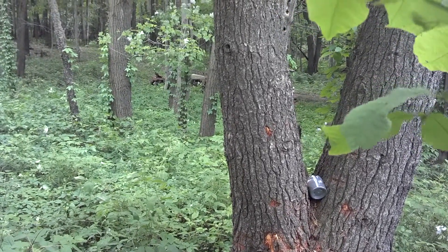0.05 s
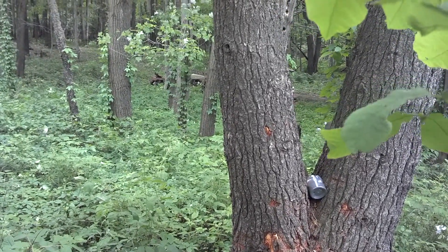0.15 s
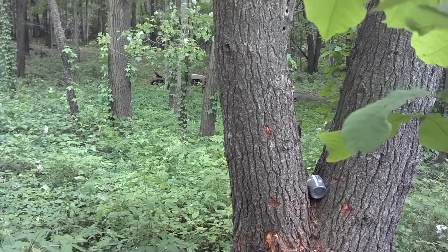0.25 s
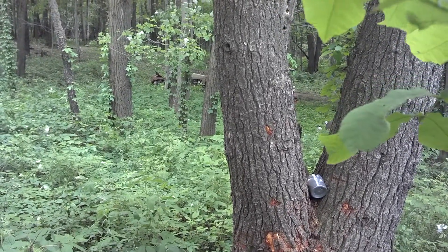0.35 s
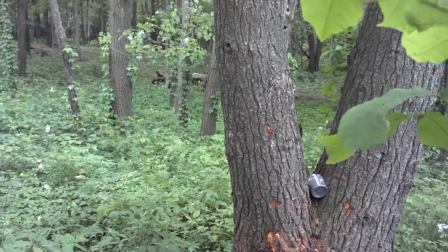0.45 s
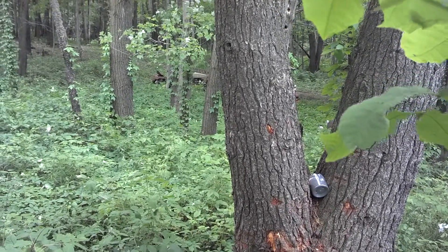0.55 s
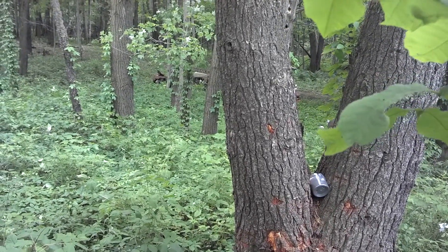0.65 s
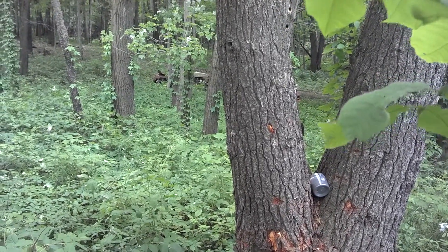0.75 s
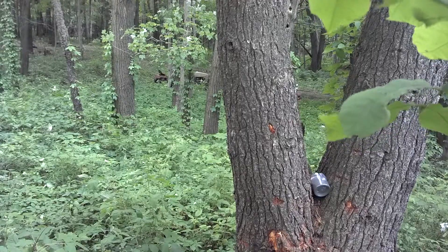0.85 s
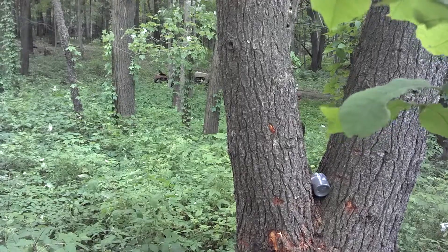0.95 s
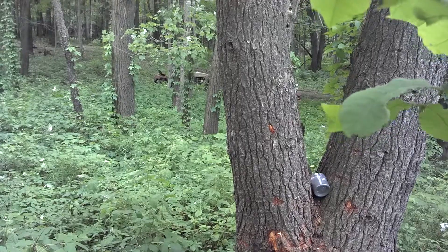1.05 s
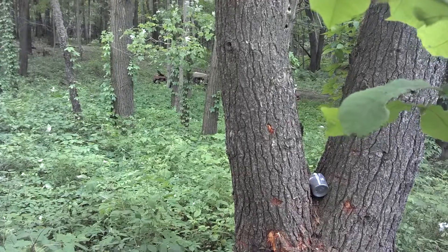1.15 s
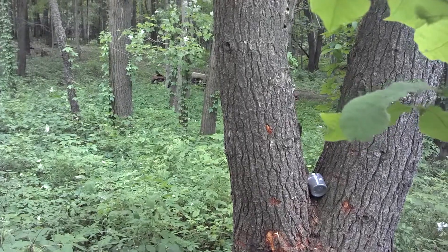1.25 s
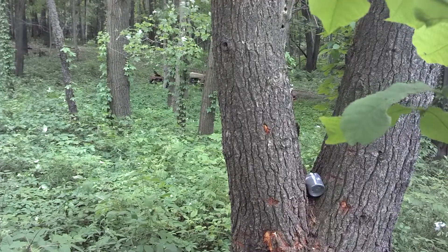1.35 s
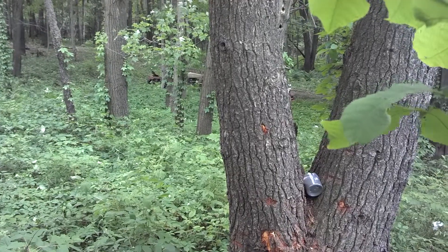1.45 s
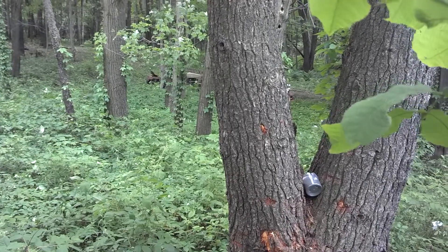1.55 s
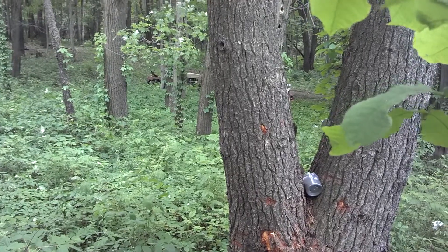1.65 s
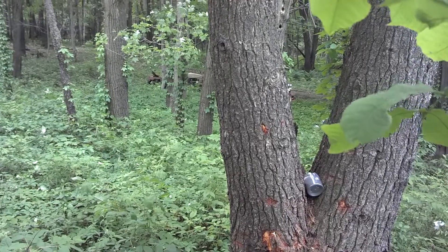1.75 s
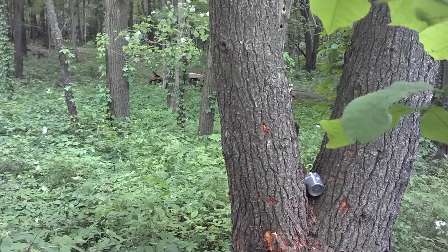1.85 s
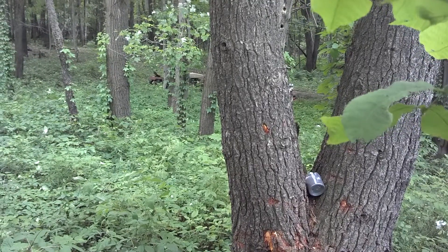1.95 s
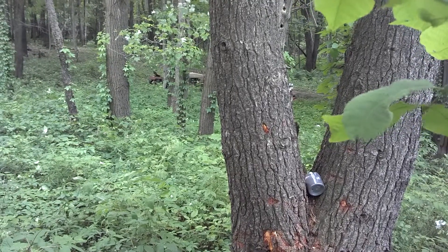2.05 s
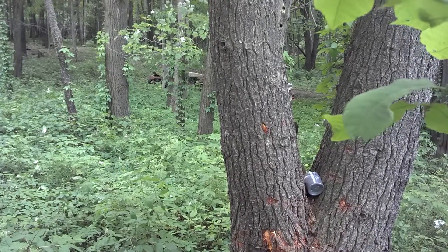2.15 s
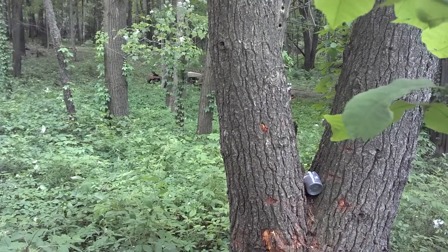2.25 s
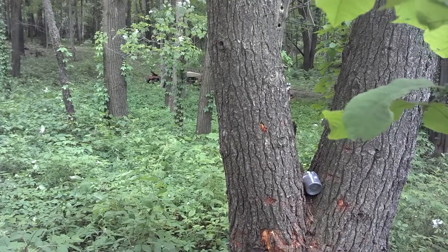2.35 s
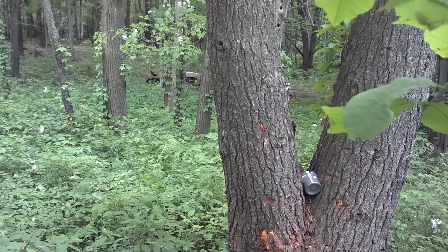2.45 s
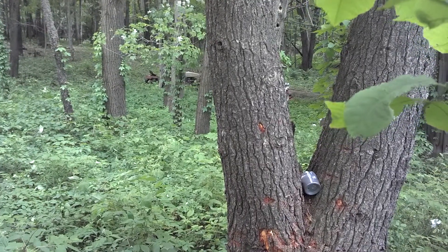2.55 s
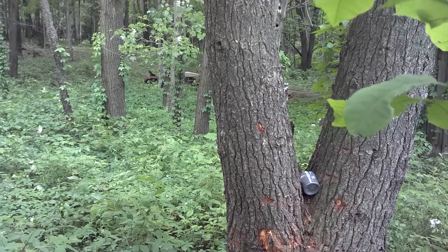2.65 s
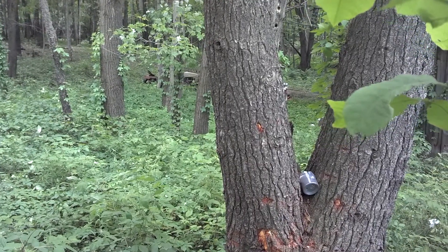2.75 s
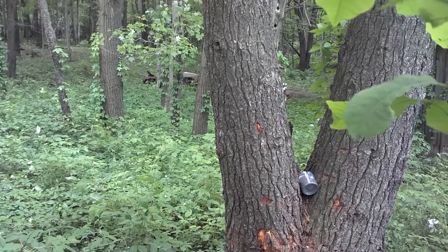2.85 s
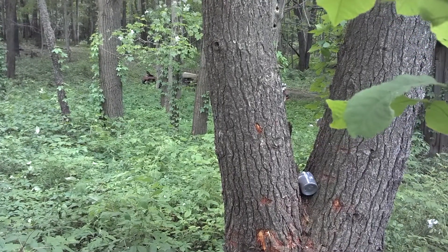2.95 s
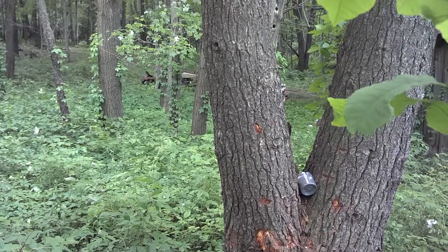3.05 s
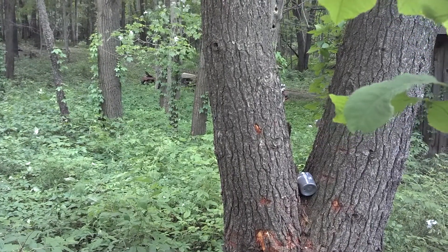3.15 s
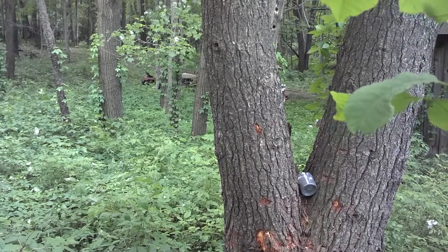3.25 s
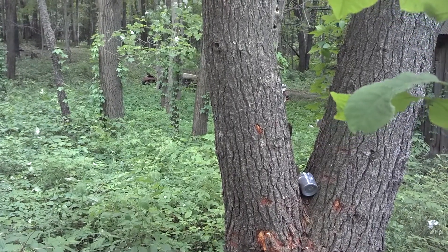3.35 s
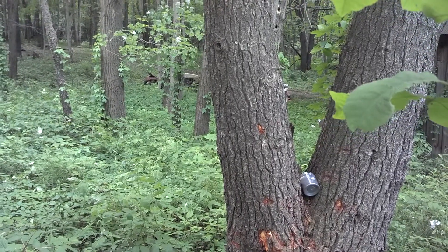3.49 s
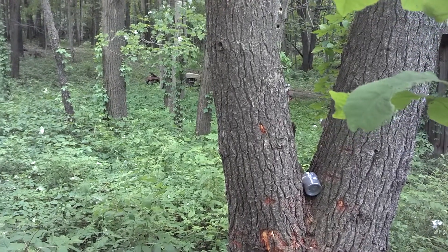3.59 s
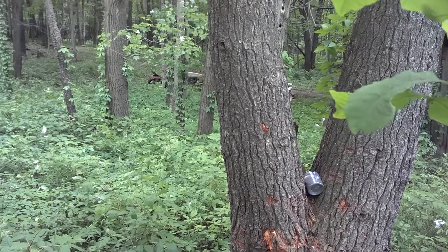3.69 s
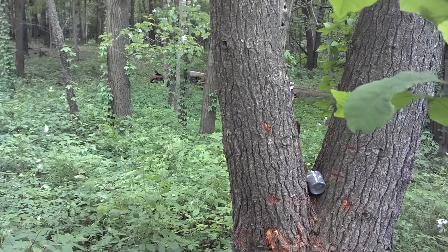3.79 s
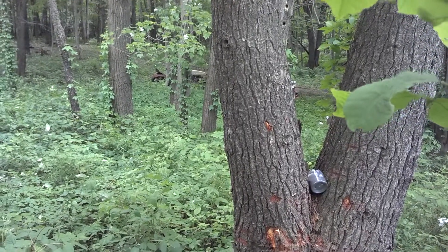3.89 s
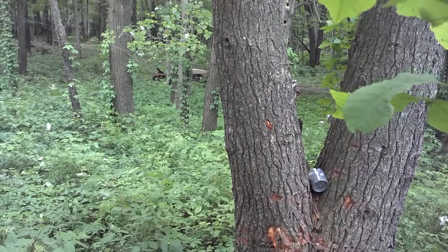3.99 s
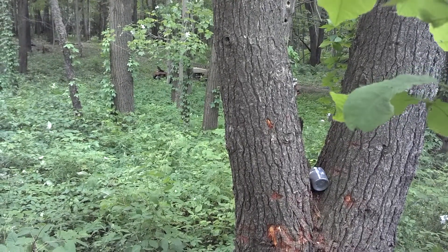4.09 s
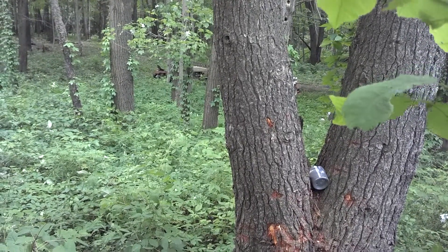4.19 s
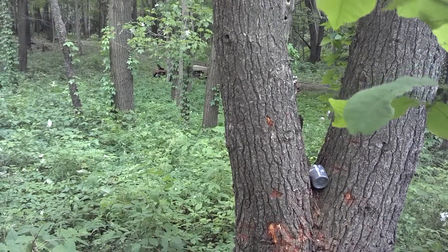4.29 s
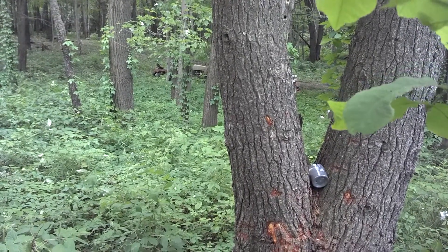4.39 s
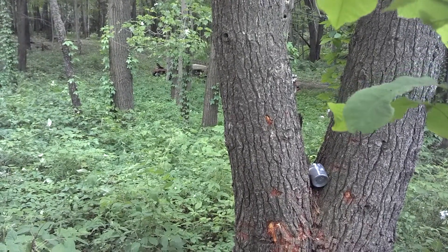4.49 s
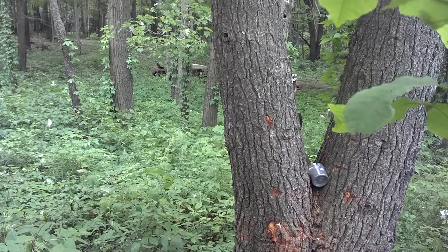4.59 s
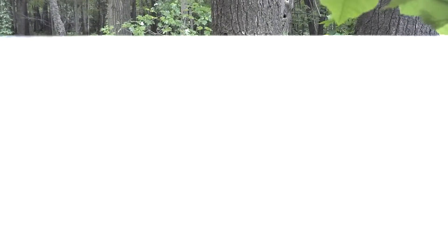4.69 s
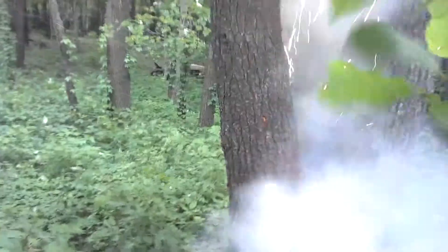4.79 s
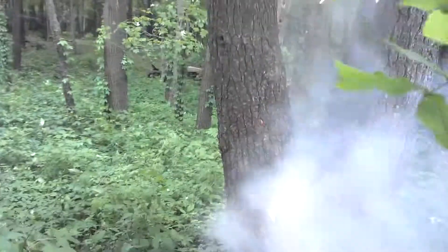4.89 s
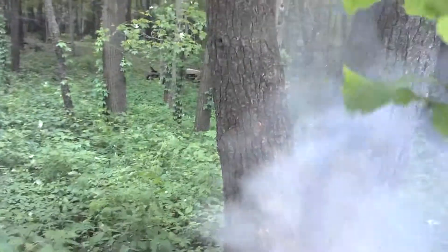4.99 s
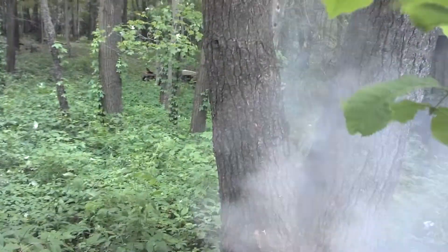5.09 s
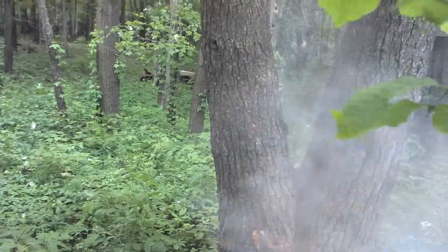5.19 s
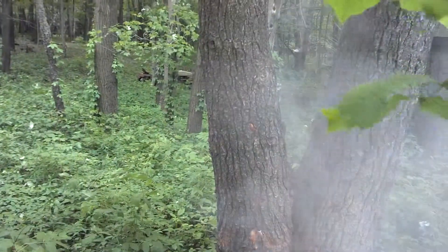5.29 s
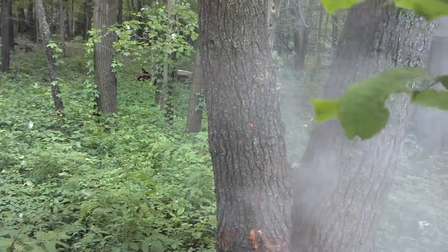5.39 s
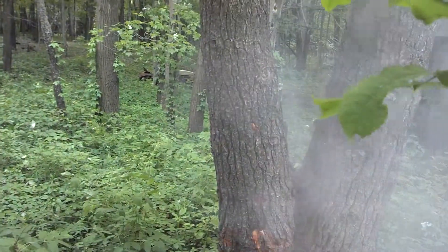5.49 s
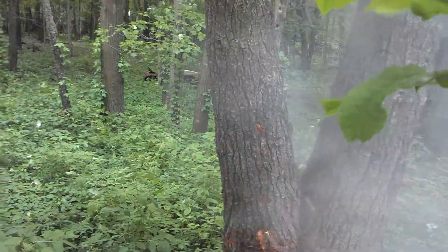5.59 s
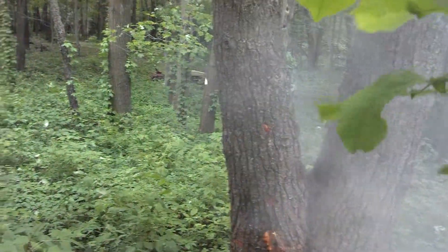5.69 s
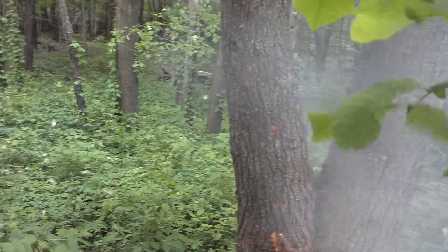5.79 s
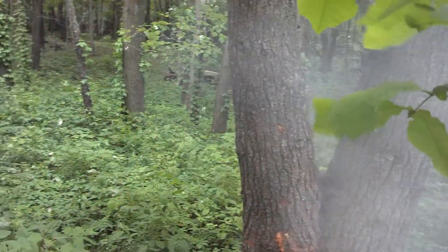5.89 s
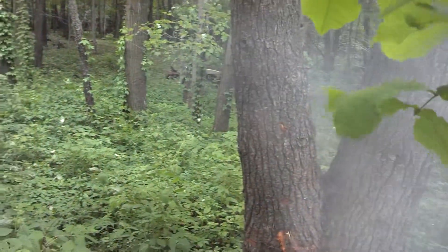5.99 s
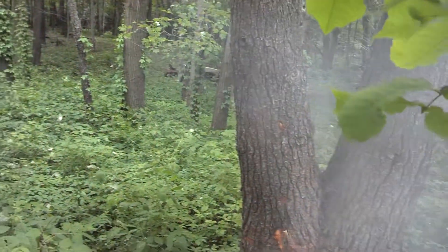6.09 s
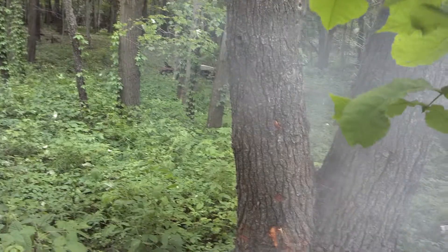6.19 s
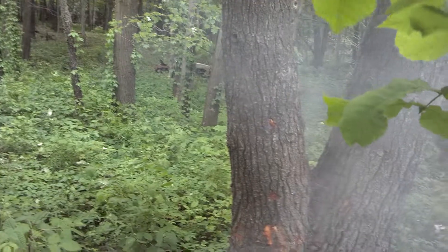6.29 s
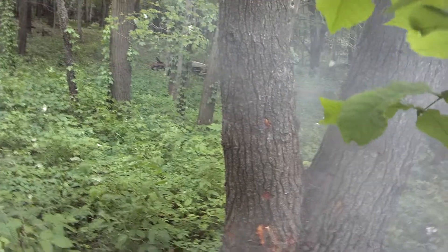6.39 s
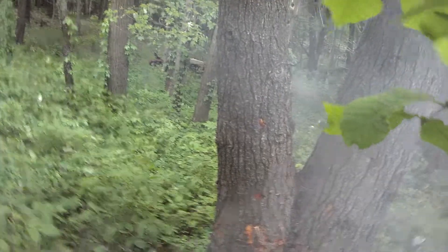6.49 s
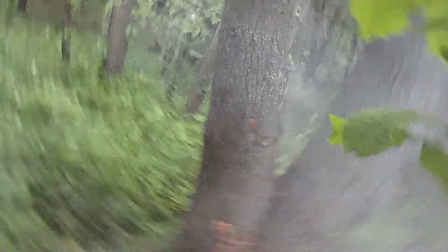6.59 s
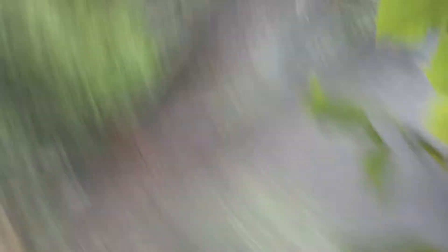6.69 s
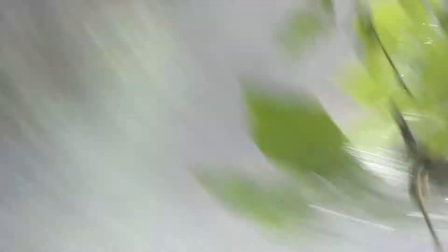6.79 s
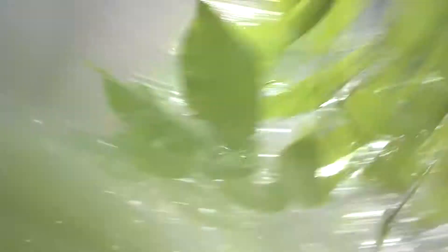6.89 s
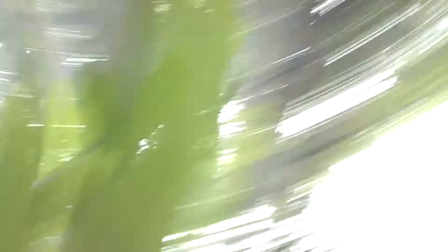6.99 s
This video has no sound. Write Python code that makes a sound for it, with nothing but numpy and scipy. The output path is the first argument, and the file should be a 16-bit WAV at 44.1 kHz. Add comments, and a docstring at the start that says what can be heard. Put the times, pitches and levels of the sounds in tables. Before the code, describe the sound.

A small handheld camera with two microphones hears a hushed forest, then a close, dry rifle crack with echo. A second shot instantly triggers a much bigger, deeper blast that overloads the microphones and suppresses the background while it rumbles away among the trees. Fine debris ticks and rustles through foliage, and the take ends in hard, flattened handling thumps, mostly on the right.

```python
"""Quiet wood, small camera with two microphone ports; wood noise is filtered noise, a far bird warbles in gliding sines.
The first rifle shot misses: a crack jumps in pressure and a muzzle report follows 24 ms later.
The second cracks and sets off a charge in a tree fork; noise scatters back from trunks, and brief sine booms give
the first swings of report and charge, then strong echoes. Noise bursts snap and patter through the leaves as debris.
At the end the camera is swung and knocked: sagging, flattened thuds, a ringing case and low rumble."""
import sys
import numpy as np
from scipy import signal
from scipy.io import wavfile
from scipy.ndimage import uniform_filter1d

SR = 44100
rng = np.random.default_rng(int(sys.argv[2]) if len(sys.argv) > 2 else 0)


def put_to_file(sound):
    """Save the sound as 16-bit audio at rate SR, in the file named by the first command-line argument."""
    columns = np.atleast_2d(sound).T  # one column per channel
    safe = np.clip(columns, -1, 1)
    whole_steps = np.round(safe * 32767)
    wavfile.write(sys.argv[1], SR, whole_steps.astype(np.int16))


N = 310464  # samples
# All levels are as they reach the ports, ahead of the camera's gain; spectra set shape only.

# Scattering among near and far trunks; each bang scales the times and lifts the far bass:
# pitch_hz, near_t60_s, far_t60_s, far_share_db
FOREST = [(50.3, .4, 5.8, -46.5), (90, 0.683, 16, -37), (138, 0.86, 6.2, -45.5), (234, 0.93, 5.6, -34),
          (443, 1, 3.88, -20), (1020, 0.83, 2.4, -12), (1852, 0.78, 2.59, -20), (4000, 0.79, 1.45, -16),
          (7900, 0.57, 0.9, -21.5), (11400, 0.38, 0.62, -12), (16100, 0.18, .45, -13.5)]
RIDGE_S, RIDGE_SPREAD_S, RIDGE_DB = 1.75, 0.28, -31.5  # late wash from a far slope
RIDGE_HZ, RIDGE_OCTAVES = 556, 0.88


def bang(spectrum, direct_db, direct_ms, rise_ms, first_db, echo_db, treble_ms, bass_ms,
         hold_s, reach, rumble_db):
    """A pressure jump, then scatter from near and far trunks, each band dying at its own speed."""
    def scatter(hz, t):
        # the decay sets in softly after the hold
        late = 0.29 * hold_s * np.logaddexp(0, (t - hold_s) / (0.27 * hold_s))
        near = amp(-120 * late / (reach * read(FOREST, hz, axis=1)))  # powers, so dB are doubled
        far = amp(-120 * late / (reach * read(FOREST, hz, axis=2)))
        far_db = read(FOREST, hz, axis=3) + rumble_db / (1 + (hz / 220) ** 2)
        # trunks stand unevenly
        clumps = evened(uniform_filter1d(rng.standard_normal(len(t)), 3)) * (hz < 1200)
        # long waves gather from a wider ring
        bloom = 1 - np.exp(-(t + 0.0056) * 1000 / bass_ms * (1 + (hz / 1200) ** 2))
        ridge_time = ((t - RIDGE_S) / RIDGE_SPREAD_S) ** 2
        ridge_pitch = (np.log2(hz / RIDGE_HZ + 1e-9) / RIDGE_OCTAVES) ** 2
        ridge = np.exp(-ridge_time - ridge_pitch)
        power = near + far * amp(2 * far_db) + ridge * amp(2 * RIDGE_DB)
        return bloom * np.sqrt(power) * amp(1.11 * clumps)

    tail = diffuse(spectrum, 4.6, scatter, sided=0.37)
    ms = np.arange(tail.shape[1]) * 1000 / SR
    rise_and_fall = np.exp(-ms / direct_ms) - np.exp(-ms / direct_ms - ms / rise_ms)
    jump = amp(direct_db) * (1 - ms / direct_ms) * rise_and_fall
    growth = 1 - np.exp(-ms / treble_ms) + amp(first_db) * np.exp(-ms / 1.2)
    # the right port faces the gun
    return jump * amp([[-6], [0.1]]) + amp(echo_db) * tail * growth


# What the wood returns of each kind of bang: pitch_hz, level_db (per Hz)
CRACK = [(40, -9), (150, -6.5), (400, 1.5), (1500, -5.5), (4000, -6), (7000, -7.5), (12000, -10.5),
         (16000, -15.5)]
MUZZLE = [(40, -18), (80, -15), (130, 4), (220, -17), (400, -2.5), (650, -7.5), (1000, -17), (2000, -18.5),
          (5000, -25), (16000, -30)]
BLAST = [(40, -24), (65, -10), (100, -6), (140, 7), (200, -1), (400, -2), (650, -8.5), (1000, -13),
         (2000, -15.5), (5000, -22), (10000, -26), (16000, -28.5)]
# When each bang reaches the camera, in the order crack, crack, muzzle report, charge: start_s
ARRIVALS = [3.2576, 4.7341, 3.2815, 4.7368]
# The four bangs in the same order: direct_db, direct_ms, rise_ms, first_db (ground and bark echoes,
# relative to echo_db), echo_db, treble_ms and bass_ms (build-up), hold_s (the roar holds),
# reach (factor on decay times), rumble_db (extra far bass)
BANGS = [(19.5, 0.15, 0.041, 11, 10, 0.23, 2.5, 0.0011, 0.91, 0.3),
         (27.5, 0.14, 0.032, -4, 8, 0.36, 2, .001, 1.32, 2),
         (13, 2.5, 0.62, -17, 8.5, 3.7, 8.9, 0.042, 1.35, 9.5),
         (25, 0.89, 0.23, -7, 17, 53, 125, 0.15, 1.304, 20)]
# Brief low booms: the first swings of muzzle report and charge, then strong echoes off trunks and slopes:
# start_s, level_db, pitch_hz, left_right_db
BOOMS = [(3.283, 4.5, 500, -24), (3.288, 10.5, 200, -13), (3.294, 8, 1090, -8.5), (3.31, 10.5, 418, -7),
         (3.33, 9.5, 287, -8), (3.357, 12.5, 467, 0), (4.7369, 7, 268, -14), (4.785, 7.5, 336, -8),
         (4.858, 3, 403, -6), (5.034, 16, 170, -4), (5.046, 13, 113, -1.5), (5.546, -6, 111, -2.5),
         (5.845, -7, 119.6, 3.5)]


def shots():
    """Cracks, muzzle report and charge spread as pressure waves; first swings and echoes boom briefly."""
    out = np.zeros((2, N))
    t = np.arange(4000) / SR
    for start_s, spectrum, how in zip(ARRIVALS, (CRACK, CRACK, MUZZLE, BLAST), BANGS):
        add(out, start_s, bang(spectrum, *how))
    for start_s, level_db, hz, pan_db in BOOMS:
        age = 1.67 * hz * t
        swell = np.e * age * np.exp(-age)  # swells and dies within about two cycles
        add(out, start_s, amp(level_db) * np.sin(2 * np.pi * hz * t) * swell, pan_db)
    return out


# Grit and bark falling through leaves: pitch_hz, level_db (per Hz)
RUSTLE = [(300, -14), (1000, -2), (2800, -1), (4100, 0), (6200, -4), (9000, -3), (12000, -5.5), (16000, -6)]
# Grit coming down: start_s, level_db
PATTER = [(5.1, -57), (5.3, -39.5), (6.051, -35), (6.55, -28), (6.9, -28), (7.04, -32.5)]
# Single pieces snapping on leaves: start_s, level_db, middle_hz, width_octaves, left_right_db
TICKS = [(5.009, -6, 11600, .8, 5), (5.018, -6, 11900, 0.54, -10), (5.671, -19.5, 8800, 1.3, 7),
         (6.141, -27, 4900, 2.5, 7), (6.279, -20, 5940, 3.8, 1), (6.3045, -11, 7000, 1.7, -4),
         (6.343, -25, 5760, 1.9, 11), (6.368, -19.5, 6000, 2.6, -23), (6.3695, -13.5, 1500, 1.3, -12),
         (6.377, -29, 4700, 2.4, -17), (6.453, -30, 3000, 1.4, -19), (6.461, -31, 3000, 0.73, 16),
         (6.544, -17, 12100, 0.38, -8), (6.762, -32, 4400, .7, -23), (6.987, -23, 13000, .5, 3)]
# Pieces brushing through a leaf: start_s, level_db, low_hz, high_hz, t60_s
SWISHES = [(6.4725, -17.5, 1200, 2630, 0.071), (6.4727, -23, 2880, 4730, 0.089),
           (6.48, -27, 2700, 4150, 0.36), (6.537, -26.5, 2870, 4730, .14)]
TICK_T60_S = 0.0064
SMALL_PER_S = 25  # lesser pieces
SMALL_OVER_DB, SMALL_SPREAD_DB = -6, 9  # least level over the patter, spread above that


def debris():
    """Many tiny hits merge into a patter; larger pieces snap or shake a leaf as noise bursts."""
    start_s, level_db = np.transpose(PATTER)
    out = np.zeros((2, N))

    def grains(hz, t):
        """Chance clusters of grit lift all pitches together."""
        return amp(1.6 * np.minimum(rng.exponential(1, len(t)), 4) + 0 * hz)

    patter = diffuse(RUSTLE, start_s[-1] - start_s[0], grains, size=128)
    add(out, start_s[0], patter * amp(levels(PATTER, patter.shape[1])))

    wait, size, tone, side = rng.random((60, 4)).T
    when = start_s[1] + np.cumsum(-np.log(1 - wait)) / SMALL_PER_S
    small_db = np.interp(when, start_s, level_db) + SMALL_OVER_DB + SMALL_SPREAD_DB * size
    small = zip(when, small_db, 3500 * 2.8 ** tone, np.ones(len(when)), 30 * (side - .5))
    for at, tick_db, hz, octaves, pan_db in [*TICKS, *small]:
        half_width = 2 ** (octaves / 2)
        add(out, at, amp(tick_db) * snap(hz / half_width, hz * half_width, TICK_T60_S), pan_db)
    for at, swish_db, low_hz, high_hz, t60_s in SWISHES:
        add(out, at, amp(swish_db) * snap(low_hz, high_hz, t60_s))
    return out


# Knocks on the right side of the camera; the thud starts at 1.54 times pitch_hz and sags to about half:
# start_s, thud_db, pitch_hz, slap_db
KNOCKS = [(6.698, -14, 296, -17), (6.709, -8, 200, -3.5), (6.869, -8, 152, -12), (6.883, -8, 157, -35),
          (6.894, -16, 150, -16), (6.917, -14, 250, -7), (6.928, 23, 310, 12), (6.964, -3, 150, -39),
          (6.982, 4.5, 204.3, -35), (7.008, -2.2, 149, -19), (7.016, 2, 150, -35), (7.028, 8.5, 288, -25)]
# What the case rings with: pitch_hz, level_db, t60_s
SLAP = [(1028, -2.5, 0.008), (1660, -7, 0.0094), (3350, -16.5, .009), (4380, -22.5, 0.0081)]
# Fingers shifting on the case: start_s, level_db
SWING = [(6.84, -32), (6.88, -13), (6.96, -19), (7.04, -7)]
# Rumble through the case: pitch_hz, level_db (per Hz)
CASE = [(30, -15), (70, 0), (130, -6), (250, -12), (400, -10), (700, -28), (1500, -34), (16000, -68)]
THUD_CYCLES = 6.5  # periods of pitch_hz in which a thud falls 60 dB
SLAP_RISE_S, SLAP_PAN_DB, GRIT_DB = .0016, -7, -23.5


def handling():
    """Knocks shake the right port for a few sagging cycles and slap the case; the grip rumbles."""
    out = np.zeros((2, N))
    t = np.arange(4000) / SR
    for start_s, thud_db, hz, slap_db in KNOCKS:
        turns = hz * t * (0.52 + 1.02 * np.exp(-t / 0.0057))
        drive = 1 + 3.2 * np.exp(-t / 0.0012)  # the first swings hit the stops of the membrane
        swings = np.tanh(drive * np.sin(2 * np.pi * turns))
        thud = swings * np.minimum(t / 0.0029, 1) * amp(thud_db - 60 * t * hz / THUD_CYCLES)
        add(out, start_s, thud * [[.06], [1]])

        ring = np.zeros(len(t))
        for mode_hz, mode_db, t60_s in SLAP:
            ring += amp(mode_db - 60 * t / t60_s) * np.sin(2 * np.pi * mode_hz * t)
        grit = amp(GRIT_DB) * snap(3000, 18000, 0.0053)[:, :len(t)]
        slap = amp(slap_db) * (ring * np.minimum(t / SLAP_RISE_S, 1) + grit)
        add(out, start_s, slap, SLAP_PAN_DB)

    rumble = diffuse(CASE, SWING[-1][0] - SWING[0][0])[:1]
    add(out, SWING[0][0], rumble * amp(levels(SWING, rumble.shape[1])) * [[.15], [1]])
    return out


# Notes of a far warble: start_s, length_s, from_hz, to_hz, level_db
BIRD = [(2.208, .04, 3200, 3150, -59), (2.25, .03, 2600, 2450, -59), (2.282, .022, 3000, 3450, -54),
        (2.302, .02, 3400, 3050, -53), (2.322, .02, 2400, 2300, -57), (2.382, .018, 3250, 2950, -57),
        (2.402, .02, 2400, 2150, -59), (2.422, .02, 2100, 2500, -60), (2.443, .024, 2950, 3300, -53),
        (2.46, .105, 3350, 3750, -61)]
GLIDE_S = .016  # pitch heads for its goal, then holds
NOTE_FADE_DB, FLUTTER_SHARE = -6, .7


def bird():
    """A far warble: short gliding whistles, their level blurred by echoes."""
    out = np.zeros((2, N))
    for start_s, length_s, from_hz, to_hz, level_db in BIRD:
        t = np.arange(0, length_s, 1 / SR)
        hz = from_hz + (to_hz - from_hz) * np.minimum(t / GLIDE_S, 1)
        flutter = uniform_filter1d(rng.standard_normal((2, 8000)), 130, axis=1)[:, :len(t)]
        edges = np.clip(np.minimum(t, length_s - t) / 0.0017, 0, 1)
        whistle = np.sin(2 * np.pi * np.cumsum(hz) / SR) * amp(level_db + NOTE_FADE_DB * t / length_s)
        add(out, start_s, edges * whistle * (1 + FLUTTER_SHARE * evened(flutter)))
    return out


# Still air, far traffic and leaves: pitch_hz, level_db (per Hz)
WOOD = [(40, -34), (70, -8), (120, 0.5), (200, -7.5), (350, -5.5), (600, -11.5), (1000, -17.5), (2800, -22),
        (4100, -22.5), (6200, -28.5), (9000, -28), (12000, -38), (15000, -37.5)]
# A little more air at first: start_s, level_db (added to WOOD_DB)
BREEZE = [(0, 1.3), (.9, 1.5), (1.1, 0), (7.04, 0)]
WOOD_DB = -43.5


def wood():
    """Still air, far traffic and leaves arrive from all sides as steady coloured noise."""
    return diffuse(WOOD, N / SR + 1, size=1024)[:, :N] * amp(WOOD_DB + levels(BREEZE, N))


# Likeness of the sound at the two ports: pitch_hz, likeness (-1 to 1)
SAME = [(40, .93), (200, .86), (400, .75), (700, .4), (1100, .05), (1700, -.2), (2800, 0), (16000, 0)]


def diffuse(spectrum, seconds, shape=lambda hz, t: 1, sided=0, size=512):
    """Noise from all sides at both ports, of power 1 where shape(hz, t) is 1; sided = unlike at first."""
    hop = size // 4
    hz = np.fft.rfftfreq(size, 1 / SR)[:, None]
    frames = int(seconds * SR) // hop + 5
    t = np.arange(frames) * hop / SR
    a, b, c, d = rng.standard_normal((frames, len(hz), 4)).T
    shared, other = a + 1j * b, c + 1j * d
    same = np.clip(read(SAME, hz) * (1 - sided * np.exp(-t / 0.1)), -1, 1)
    lag = np.exp(-2j * np.pi * hz * .00009)  # more sound reaches the right port first
    bins = np.array([shared * lag, same * shared + np.sqrt(1 - same ** 2) * other])
    bins *= evened(amp(read(spectrum, hz))) * shape(hz, t)
    noise = signal.istft(bins, nperseg=size, noverlap=3 * size // 4)[1]
    return noise[:, :int(seconds * SR)] * np.sqrt(2 / 3 / size)


def snap(low_hz, high_hz, t60_s):
    """A burst of noise in a band, starting at about power 1 and dying by 60 dB in t60_s."""
    fade = amp(-60 * np.arange(6000) / SR / t60_s)
    band = signal.butter(2, np.clip([low_hz, high_hz], 100, 17000), "band", fs=SR)
    burst = signal.lfilter(*band, rng.standard_normal((2, len(fade)))) * fade
    return evened(burst) * np.sqrt(np.mean(fade ** 2))


def amp(db):
    """Amplitude factor for a level in dB."""
    return 10 ** (np.asarray(db) / 20)


def evened(x):
    """Scaled to a mean power of 1."""
    return x / np.sqrt(np.mean(x ** 2) + 1e-20)


def read(points, hz, axis=1):
    """A table column read along a logarithmic pitch axis."""
    table = np.transpose(points)
    return np.interp(np.log(hz + 1), np.log(table[0] + 1), table[axis])


def levels(points, count):
    """Level in dB for each sample from the first start_s of a table on."""
    start_s, level_db = np.transpose(points)
    return np.interp(start_s[0] + np.arange(count) / SR, start_s, level_db)


def add(mix, start_s, sound, pan_db=0):
    """Lays a sound into the mix; positive pan_db makes the left louder."""
    part = mix[:, round(start_s * SR):][:, :np.shape(sound)[-1]]
    part += (sound * amp([[pan_db / 2], [-pan_db / 2]]))[:, :part.shape[1]]


def scene():
    """All that reaches the ports, from the shots to the quiet behind them."""
    return shots() + debris() + handling() + bird() + wood()


def held(db, fall):
    """Follows rises at once and falls by so many dB a second."""
    slope = np.arange(N) * fall / SR
    return np.maximum.accumulate(db + slope) - slope


CROSS = 16  # samples by which each port is fed, inverted, to the other side
EDGE_HZ = 16000  # upper band limit


def record(dry):
    """Bass cut, widening, a gain that drops at a bang and recovers slowly, clipping, hiss, band limit."""
    ports = signal.sosfilt(signal.butter(2, 70, "high", fs=SR, output="sos"), dry)
    wide = ports - .99 * np.pad(ports[::-1], ((0, 0), (CROSS, 0)))[:, :N]
    power = uniform_filter1d((wide ** 2).mean(0), 45, origin=22)  # over the last millisecond
    power_db = 10 * np.log10(abs(power) + 1e-12)
    down_db = np.maximum(held(np.clip(power_db + 22, 0, 20.5), .8), 0)
    hiss = amp(-86) * rng.standard_normal((2, N))  # the amplifier after the gain stage
    ducked = np.clip(wide / amp(down_db), -1, 1) + hiss
    low_pass = signal.firwin(511, EDGE_HZ, window=("kaiser", 9), fs=SR)
    return signal.oaconvolve(ducked, low_pass[None], "same")


dry = scene()
out = record(dry)
put_to_file(out)
```